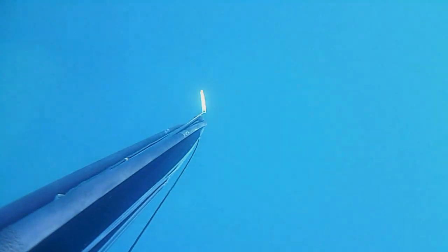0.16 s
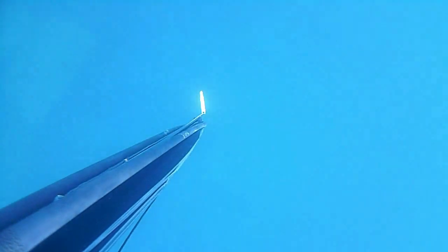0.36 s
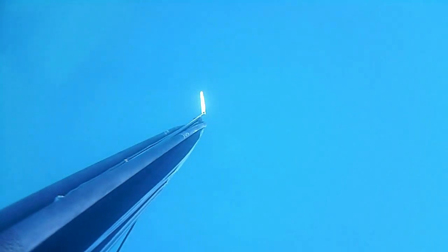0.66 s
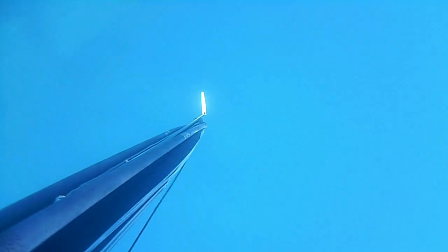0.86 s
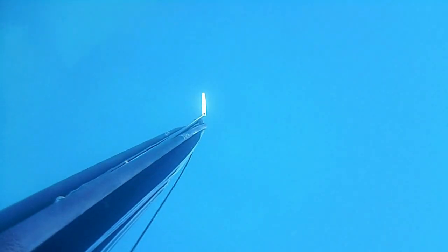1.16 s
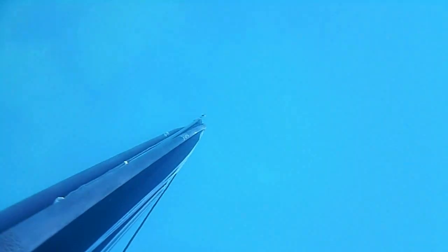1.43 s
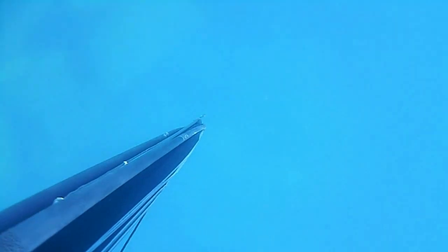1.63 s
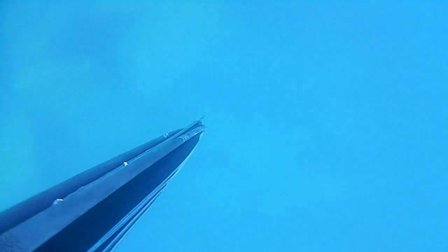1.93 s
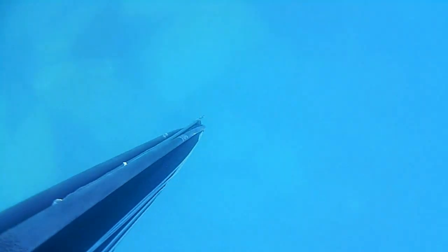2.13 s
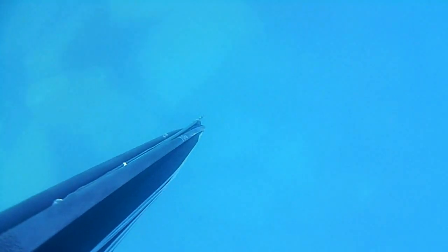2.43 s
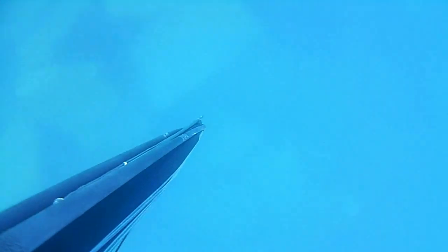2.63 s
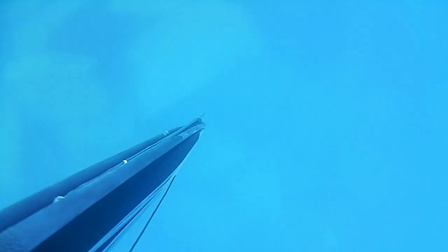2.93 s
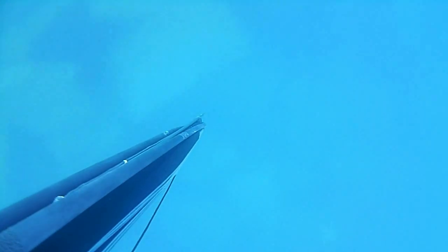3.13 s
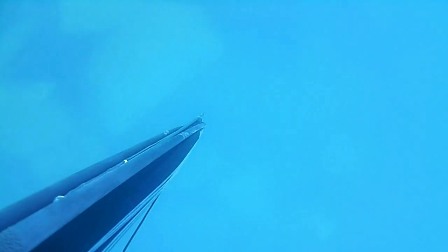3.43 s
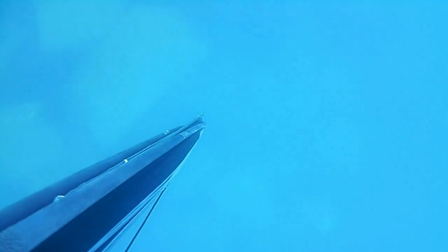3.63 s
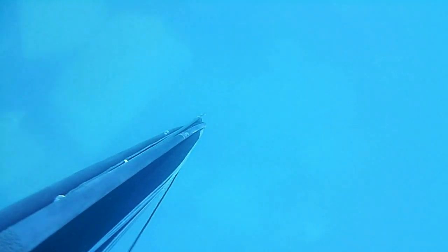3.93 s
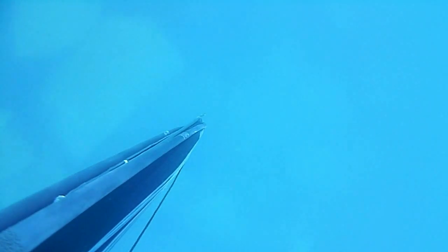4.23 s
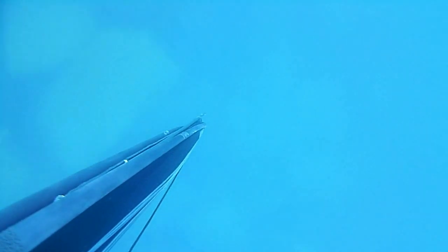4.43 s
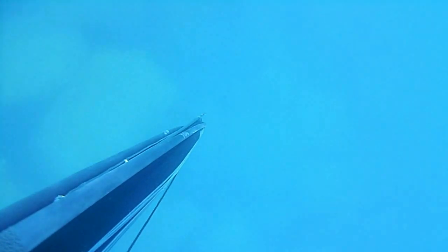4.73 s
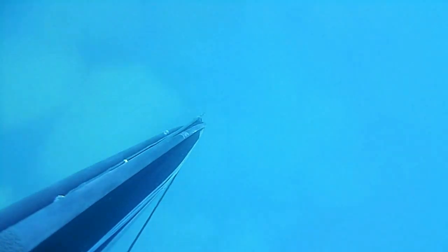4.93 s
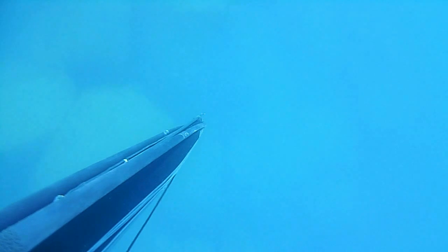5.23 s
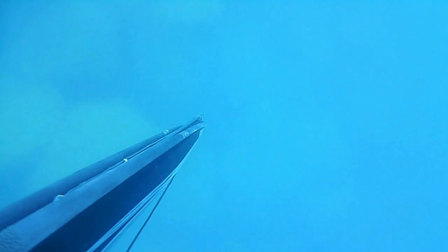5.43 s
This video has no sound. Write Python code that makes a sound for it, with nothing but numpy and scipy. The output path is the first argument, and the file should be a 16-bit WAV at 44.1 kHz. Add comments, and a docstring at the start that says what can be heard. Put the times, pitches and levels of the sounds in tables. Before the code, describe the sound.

Hard gripping squeaks overload an underwater camera case, followed by sparse knocks, bubble blips and muffled water rumble that gradually quiets.

```python
"""A hand grip on a speargun rubs and squeaks in three strokes and some hard slips, under water.
Stick-slip grains and a squeal shake a sealed case, at times hard enough to overload its microphone.
The gun thumps as slow sways push the case; knocks and faint ticks ring the case's own notes.
Bubbles ring at their own pitches or hiss in puffs. Behind it all, shaped noise makes moving water
rumble, hum and fizz, over the faint, steady, nearly smooth hiss of the far sea."""
import sys
import numpy as np
from scipy import signal
from scipy.fft import rfft, irfft
from scipy.io import wavfile
from scipy.ndimage import uniform_filter1d

SR = 44100
rng = np.random.default_rng(int(sys.argv[2]) if len(sys.argv) > 2 else 0)


def master_out(mix):
    """Clip the mix to full scale and print it as 16-bit PCM to the path in sys.argv[1]."""
    frames = np.transpose(np.atleast_2d(mix))
    ceiling = np.clip(frames, -1, 1)
    pcm = np.round(ceiling * 32767).astype(np.int16)
    wavfile.write(sys.argv[1], SR, pcm)


N = 246078
TIME = np.arange(N) / SR  # seconds

# Three strokes of the rubbing grip, one curve each, before the cap: [t/s, level/dB]
GRIP_STROKES = [
    [(0.12, -16), (0.132, -9.5), (0.15, -8), (0.164, -24), (0.254, -22.5), (0.264, -37.5), (0.324, -23.5),
     (0.355, -51)],
    [(0.748, -44.5), (0.77, -20), (0.79, -20.5), (0.802, -25), (0.844, -33), (0.875, -63)],
    [(1.552, -32.5), (1.564, -24.5), (1.654, -19), (1.676, -29.5), (1.682, -28.5), (1.72, -51)],
]
# Hard slips of the grip, before trim and judder:
# [t/s, time held/s, level/dB, squeal share of the power 0-1, squeal f/Hz]
GRIP_SLIPS = [(.092, 0.0055, -4, 0.58, 508), (0.1021, 0.0024, .5, 0.75, 475),
              (0.1103, 0.0035, -5, 0.1, 413), (0.1194, 0.0047, 0, 0.23, 696),
              (0.124, .029, -4.5, 0.72, 580.7), (0.169, 0.0021, -11, 0.2, 933),
              (0.242, .016, -27, 1, 572.5), (.7672, 0.0069, -14, 0.9, 826), (0.7793, 0.0082, -18, 0.4, 639),
              (.833, .012, -26.5, 1, 600), (1.631, 0.0075, -15, 0.9, 620.3), (1.643, 0.012, -16, 0.88, 575)]
# Tone of the case under a rubbing grip: [f/Hz, relative level per Hz/dB]
RUBBED_CASE_TONE = [(100, -39.5), (320, -29.5), (470, -10), (580, 1.5), (670, -5.5), (800, -2), (930, -6.5),
                    (1030, -24.5), (1140, -1.5), (1300, -8), (1450, -25.5), (2000, -25.5), (2800, -37.5),
                    (4000, -37)]
# Sways of the gun that push the case: [t/s, peak level/dB, f/Hz, time to the peak/s]
GUN_SWAYS = [(0.093, -12, 61, 0.017), (0.149, -10, 57, 0.011), (0.215, -16.5, 49.7, .022),
             (.328, -29, 29.3, 0.047), (0.755, -26.5, 67.4, 0.034), (1.086, -26.5, 63.6, 0.022),
             (1.119, -28, 26.4, 0.08), (1.182, -33, 75, .009), (2.001, -21, 58, 0.02),
             (2.8, -32, 31.1, 0.046), (3.672, -24.5, 57, .016), (3.713, -30.5, 29.1, 0.043),
             (4.126, -34, 65, 0.02), (4.641, -34, 54.7, .014), (5, -30, 55.6, 0.023)]
# Knocks on the case, before the overload: [t/s, peak level/dB, favoured f/Hz, spread around it/octaves]
CASE_KNOCKS = [(.094, -10, 206.5, 0.66), (.535, -36, 666, .8), (.667, -37, 700, 1.3),
               (1.1196, -16, 246, 1.44), (1.3046, -12, 670, 1.22), (1.765, -30.5, 526, .44),
               (2.234, -26.5, 550, .6), (2.3024, -24.5, 740, 1.1), (2.3603, -25, 800, 1),
               (2.5084, -21, 800, .9), (2.543, -24.5, 560, .55), (2.6, -26, 524, 1.15),
               (2.785, -35.5, 1100, 0.94), (2.823, -35, 3200, 1.9), (3.04, -43, 3000, 1.1),
               (1.011, -41, 540, .6), (3.349, -37, 450, 0.33), (4.179, -44, 1200, 1.3),
               (2.7548, -22.5, 890, .9), (2.811, -28.5, 600, .72), (3.1452, -33, 614, .54),
               (3.1788, -38, 620, 1), (3.665, -34.5, 700, 1.9), (3.876, -39, 506, .6), (3.93, -42, 460, .7),
               (4.416, -38.5, 720, 2.1), (4.4563, -25.5, 440, .78), (4.683, -44.5, 2000, 1.15),
               (4.963, -44, 550, .72), (5.463, -42.5, 400, 0.36), (5.542, -42, 2210, 0.37)]
# Notes of the struck case: [f/Hz, relative level/dB, time to fall by 60 dB/s]
CASE_NOTES = [(120, 0.5, 0.078), (185, -1, 0.061), (272, 0, 0.02), (443.6, -3, 0.059), (576.5, -2, 0.055),
              (820, -19.5, 0.066), (940, -19, 0.033), (1310, -5.5, 0.016), (1460, -12.5, 0.014),
              (1822, -7, 0.044), (2670, -10, 0.0099), (3200, -14, 0.028)]
# Single bubbles, from deep glugs to small pings, before the overload:
# [t/s, peak level/dB, f/Hz, time to fall by 60 dB/s]
SINGLE_BUBBLES = [(.572, -46, 2030, 0.031), (0.949, -34.5, 186.4, 0.15), (1.187, -26, 158, 0.041),
                  (1.206, -32.5, 328, 0.031), (1.24, -23, 264, 0.025), (1.333, -43, 1990, 0.042),
                  (1.365, -44.5, 1880, 0.09), (1.543, -29.5, 1910, 0.034), (2.179, -34.5, 1826, 0.04),
                  (2.514, -33, 443, 0.13), (4.178, -26, 294, 0.072), (4.18, -50, 1893, 0.22),
                  (3.936, -40.5, 137.4, 0.26), (4.184, -35.5, 553, .18), (4.458, -36.5, 564, 0.15),
                  (4.572, -37.5, 263, 0.081), (4.6005, -40.5, 627, 0.12)]
# Puffs of fine bubbles, before the overload: [t/s, level/dB, centre f/Hz, time to the peak/s]
BUBBLE_PUFFS = [(1.168, -43, 3370, 0.0018), (1.543, -34.5, 2980, 0.0016), (4.524, -52, 2400, 0.0096),
                (4.717, -56.5, 2600, 0.0047), (5, -58, 2300, 0.0059)]
# Moving water, before trims, gushes and flutter: [t/s, rumble level/dB, case hum level/dB]
WATER_FLOW = [(0, -31.5, -41), (0.099, -46, -39.5), (0.221, -35, -49), (0.601, -42.5, -60),
              (.8, -39, -47.5), (1.0, -43, -53), (1.141, -30.5, -49), (1.3, -40, -54.5),
              (1.519, -38.5, -52.5), (1.719, -35.5, -45.5), (2.3, -33, -44), (2.998, -35.5, -47),
              (3.35, -35, -50), (3.58, -42.5, -54.5), (4.05, -42, -58.5), (4.35, -47.5, -59),
              (4.7, -46, -58.5), (5.58, -42, -60.5)]
# Gushes along the case: [t/s at the crest, length/s, lift of the hum/dB, lift of the fizz/dB]
WATER_GUSHES = [(1.808, 0.1, 4.5, 4.5), (1.97, 0.12, 5, 2.5), (2.283, 0.1, 7.5, 4), (2.542, 0.16, 6, 3),
                (2.836, 0.13, 5.5, 4.5), (3.246, 0.19, 6, 10.5), (4.06, 0.15, 9, 8), (4.684, 0.35, 4.5, 4),
                (5.353, 0.18, 3, 8.5)]
# Tone of the water's rumble: [f/Hz, relative level per Hz/dB]
RUMBLE_TONE = [(10, -22.5), (21, -7), (29, 5.5), (39, -11), (53, 1.5), (72, -0.5), (95, -11.5), (125, -16),
               (170, -22.5), (260, -27.5), (400, -31.5), (800, -67)]
# Tone of the hum that the flow stirs in the case: [f/Hz, relative level per Hz/dB]
HUM_TONE = [(130, -33.5), (225, -18.5), (280, -12), (345, -18), (415, -8.5), (460, 5), (505, -2.5),
            (570, 3), (635, -10), (720, -15.5), (830, -21.5), (915, -16), (1050, -37), (1500, -73.5)]
# Tone of the fizz that the flow stirs in the case: [f/Hz, relative level per Hz/dB]
FIZZ_TONE = [(600, -21), (900, -10.5), (1050, -8.5), (1150, 1.5), (1330, -0.5), (1560, -7.5), (1680, 1.5),
             (1880, 3.5), (2000, -4.5), (2250, -14), (2650, -11), (2920, -21.5), (3250, -13.5), (4200, -23)]
# Tone of the far sea's steady hiss: [f/Hz, relative level per Hz/dB]
SEA_TONE = [(600, -16), (1100, -8), (1380, -1.5), (1580, -6.5), (1860, 7), (2300, 1.5), (2650, 2),
            (2900, -4.5), (3700, 4), (4300, -21)]
# Tone given to the sharp sounds after clipping: [f/Hz, gain/dB]
CLIPPED_TONE = [(2700, -2), (3600, 1), (4300, -10), (5200, -6.5), (7300, -6), (9000, -18.5), (11000, -18),
                (15000, -19.5)]

# A sliding grip sings at this pitch, with this share of its power; a smooth stroke gets no louder than the cap
STROKE_SQUEAL_HZ, STROKE_SQUEAL_SHARE, STROKE_CAP_DB = 588, 0.15, -21.5
# Faint ticks of drifting grit: average rate, middle level, chance spread, favoured pitch and spread around it
TICKS_PER_S, TICK_DB, TICK_SPREAD_DB, TICK_HZ, TICK_OCTAVES = 2.4, -48, -0.5, 2020, 0.82
# At this hum level the fizz lies this far below the hum; it follows the hum's changes by this share
BRISK_FLOW_DB, FIZZ_UNDER_DB, FIZZ_FOLLOWS = -41.5, -13.5, 0.94
TREBLE_CUT_HZ = 4300  # steep treble cut: little sounds above this
OVERLOAD_DB = -13
# The left side lags by up to this much; well below the heave pitch both sides move together
LEFT_LAG_S, HEAVE_HZ = 0.0001246, 60
NOISE_FLOOR_DB, TOP_HZ = -99, 15700


def gain_of(db):
    """Turns decibels into a plain multiplier."""
    return 10 ** (np.asarray(db) / 20)


def evened(x):
    """Scales a sound to an average strength (rms) of 1."""
    return x / np.sqrt(np.mean(x ** 2) + 1e-20)


def add(mix, s, sound):
    """Mixes a sound in at time s, cutting off whatever runs past the end."""
    part = mix[max(round(s * SR), 0):][:len(sound)]
    part += sound[:len(part)]


def response(points, size=32768):
    """Builds how a body with this tone answers a click: nothing sounds before the click."""
    hz, db = np.transpose(points)
    bins_hz = abs(np.fft.fftfreq(size, 1 / SR)) + 1  # the 1 avoids log(0)
    log_gain = np.log(gain_of(np.interp(np.log(bins_hz), np.log(hz), db)))
    spectrum = np.exp(np.conj(signal.hilbert(log_gain)))  # minimum phase: the energy comes early
    return np.fft.ifft(spectrum).real[:size // 2]


def through(x, points):
    """Passes a sound through a body with this tone."""
    return signal.fftconvolve(x, response(points))[:len(x)]


def drift(n, hz):
    """Makes a random wander of rms 1 over the whole scene that is mostly slower than the given rate."""
    slowness = 1 + (np.fft.rfftfreq(N, 1 / SR) / hz) ** 4
    return evened(irfft(rfft(rng.standard_normal(N)) / slowness, N))[:n]


def grains(per_s, spread_db, share):
    """Mixes tiny impacts of uneven size, by their share of the power, with smooth noise."""
    sizes = gain_of(spread_db * np.minimum(rng.exponential(1, N), 4)) * rng.choice([-1, 1], N)
    share = np.clip(share, 0, 1)
    impacts = evened(sizes * (rng.random(N) < per_s / SR))
    return np.sqrt(share) * impacts + np.sqrt(1 - share) * rng.standard_normal(N)


def grip(catch_s=0.00079, release_s=0.0021, waver=.031, stroke_db=0, slip_db=-0.5, judder_db=1.0):
    """The grip sticks and slips in tiny jerks that shake the case, partly locked into a steady squeal."""
    friction = through(grains(per_s=880, spread_db=1, share=0.74), RUBBED_CASE_TONE)
    friction /= np.sqrt(uniform_filter1d(friction ** 2, size=600))  # the hand alone sets the level
    bend = 1 + waver * drift(N, hz=93.7)  # the squeal's pitch wanders
    judder = gain_of(judder_db * drift(N, hz=128))

    def rubbing(squeal, hz):
        """Mixes rasp and squeal by the squeal's share of the power."""
        squeal = np.clip(squeal, 0, 1)
        tone = np.sin(2 * np.pi * np.cumsum(hz * bend) / SR)
        return np.sqrt(1 - squeal) * friction + np.sqrt(2 * squeal) * tone

    effort = np.zeros(N)
    for s, db in map(np.transpose, GRIP_STROKES):
        level_db = np.minimum(np.interp(TIME, s, db) + stroke_db, STROKE_CAP_DB)
        effort += gain_of(level_db) * (TIME > s[0]) * (TIME < s[-1])
    out = effort * rubbing(STROKE_SQUEAL_SHARE, STROKE_SQUEAL_HZ)

    t = TIME[:SR // 10]
    for s, held_s, db, squeal, hz in GRIP_SLIPS:
        pressure = (1 - np.exp(-t / catch_s)) * np.exp(-np.maximum(t - held_s, 0) / release_s)
        slip = rubbing(squeal, hz)[round(s * SR):][:len(t)]
        add(out, s, gain_of(db + slip_db) * pressure * slip)
    return ringing(out * judder, ring_db=-8.5)


def ringing(x, ring_db):
    """Adds the after-ring of the case's own notes to whatever shakes it."""
    t = TIME[:SR // 8]
    ring = sum(gain_of(db - 60 * t / t60) * np.cos(2 * np.pi * hz * t) for hz, db, t60 in CASE_NOTES)
    ring /= abs(rfft(ring)).max()  # the strongest pitch passes at gain 1
    return x + gain_of(ring_db) * signal.fftconvolve(x, ring)[:len(x)]


def thumps():
    """Each sway of the gun pushes the case in a few heavy cycles that swell and die."""
    out, t = np.zeros(N), TIME[:SR // 2]
    for s, db, hz, rise in GUN_SWAYS:
        swell = (t / rise * np.exp(1 - t / rise)) ** 2
        add(out, s, gain_of(db) * swell * np.sin(2 * np.pi * hz * t))
    return out


def knocks(scatter_db=4.0):
    """Every knock and stray tick rings the same case notes, weighted by the pitch its contact favours."""
    out, t = np.zeros(N), TIME[:SR // 5]
    hz, note_db, t60 = np.transpose(CASE_NOTES)[:, :, None]
    signs = (-1) ** np.arange(len(hz))[:, None]  # neighbouring notes start in opposite directions
    fading = np.exp(-np.log(1000) * t / t60)
    notes = signs * gain_of(note_db) * fading * np.sin(2 * np.pi * hz * t)

    moments = TIME[rng.random(N) < TICKS_PER_S / SR]
    sizes = rng.standard_normal(size=100)  # more than enough for the ticks
    ticks = [(s, TICK_DB + TICK_SPREAD_DB * size, TICK_HZ, TICK_OCTAVES) for s, size in zip(moments, sizes)]
    lucks = rng.standard_normal((len(CASE_KNOCKS) + len(sizes), len(hz), 1))
    for (s, db, contact_hz, spread), luck in zip(CASE_KNOCKS + ticks, lucks):
        favour = np.exp(-(np.log2(hz / contact_hz) / spread) ** 2 / 2)
        weight = favour * gain_of(scatter_db * luck)  # no two hits are quite alike
        ring = (weight * notes).sum(0)
        add(out, s, gain_of(db) * ring / abs(ring).max())
    return out


def bubbles(start_cycles=0.66, waver=0.0054):
    """Each bubble rings at its own pitch, wobbling as its shape changes."""
    out, t = np.zeros(N), TIME[:SR // 4]
    wobble = drift(N, hz=152)
    for s, db, hz, t60 in SINGLE_BUBBLES:
        pitch = hz * (1 + waver * wobble[round(s * SR):][:len(t)])
        turns = np.cumsum(pitch) / SR  # cycles completed so far
        soft_start = 1 - np.exp(-(turns / start_cycles) ** 2)
        dying = np.exp(-np.log(1000) * t / t60)
        add(out, s, gain_of(db) * dying * soft_start * np.sin(2 * np.pi * turns))
    return out


def puffs(width_octaves=0.5):
    """A cloud of tiny bubbles makes a short soft hiss around one pitch."""
    out, t = np.zeros(N), TIME[:SR // 8]
    hz = np.fft.rfftfreq(len(t), 1 / SR) + 1
    noises = rng.standard_normal((len(BUBBLE_PUFFS), len(t)))
    for (s, db, centre_hz, rise), noise in zip(BUBBLE_PUFFS, noises):
        band = np.exp(-(np.log2(hz / centre_hz) / width_octaves) ** 2 / 2)
        cloud = evened(irfft(rfft(noise) * band, len(t)))
        swell = t / rise * np.exp(1 - t / rise)
        add(out, s, gain_of(db) * cloud * swell)
    return out


def water(rumble_db=-1, hum_db=0, flutter_db=1.5, fizz_flutter_db=3.03):
    """Eddies buffet the case, stir its low notes and fizz along its walls; gushes lift hum and fizz."""
    s, *columns = np.transpose(WATER_FLOW)
    push_db, stir_db = (np.interp(TIME, s, column) for column in columns)
    wash_db = BRISK_FLOW_DB + FIZZ_UNDER_DB + FIZZ_FOLLOWS * (stir_db - BRISK_FLOW_DB)
    for crest, length, hum_lift_db, fizz_lift_db in WATER_GUSHES:
        swell = np.exp(-(2 * (TIME - crest) / length) ** 2)
        stir_db = stir_db + hum_lift_db * swell
        wash_db = wash_db + fizz_lift_db * swell

    eddies = through(rng.standard_normal(N), RUMBLE_TONE)
    eddies /= np.sqrt(uniform_filter1d(eddies ** 2, size=6000))  # the flow alone sets the slow swell
    rumble = eddies * gain_of(push_db + rumble_db)
    flutter = drift(N, hz=25.0)  # hum and fizz flutter together
    hum = evened(through(grains(per_s=720, spread_db=2.5, share=.3), HUM_TONE))
    hum *= gain_of(stir_db + hum_db + flutter_db * flutter)
    fizz = evened(through(grains(per_s=110, spread_db=-2.5, share=0.19), FIZZ_TONE))
    fizz *= gain_of(wash_db + fizz_flutter_db * flutter)
    return rumble + hum + fizz


def far_sea(sea_db=-69):
    """The far sea is a faint, steady, nearly smooth hiss: mostly smooth noise with a tone of its own."""
    return evened(through(grains(per_s=100, spread_db=-2.5, share=0.2), SEA_TONE)) * gain_of(sea_db)


def treble_cut(x):
    """Cuts the treble very steeply, so that little sounds above the cut."""
    hz = np.fft.rfftfreq(N, 1 / SR)
    return irfft(rfft(x) / (1 + (hz / TREBLE_CUT_HZ) ** 80), N)


def overloaded(x):
    """The microphone squashes peaks near its limit; the clipped sound is then given its tone."""
    limit = gain_of(OVERLOAD_DB)
    clipped = x / (1 + (x / limit) ** 10) ** (1 / 10)
    return through(clipped, CLIPPED_TONE)


def scattered(x, level_db=-12, corner_hz=1700, ring_s=0.0016):
    """Short waves bounce around inside the case as a burst of dense, random, fading echoes."""
    t = TIME[:SR // 50]
    echoes = rng.standard_normal(len(t)) * np.exp(-t / ring_s)
    treble = signal.sosfilt(signal.butter(2, corner_hz, "high", fs=SR, output="sos"), x)
    return gain_of(level_db) * signal.fftconvolve(treble, echoes / np.linalg.norm(echoes))[:N]


def scene():
    """Sharp sounds overload the microphone; water and slow thumps are added without overload."""
    sharp = treble_cut(grip() + knocks() + bubbles() + puffs())
    mono = overloaded(sharp) + treble_cut(water() + far_sea()) + thumps()
    hz = np.fft.rfftfreq(N, 1 / SR)
    lag = LEFT_LAG_S * hz ** 2 / (hz ** 2 + HEAVE_HZ ** 2)
    left = irfft(rfft(mono) * np.exp(-2j * np.pi * hz * lag), N)  # the far port hears it later
    opposite = np.array([[1], [-1]])  # the echoes reach the two ports with opposite sign
    return np.array([left, mono]) + opposite * scattered(mono)


def record(dry):
    """Adds a very faint, flat noise floor, then cuts everything above the top pitch."""
    noisy = dry + gain_of(NOISE_FLOOR_DB) * rng.standard_normal(dry.shape)
    low_pass = signal.firwin(511, TOP_HZ, window=("kaiser", 9), fs=SR)
    return signal.oaconvolve(noisy, low_pass[None], "same")


dry = scene()
out = record(dry)
master_out(out)
```